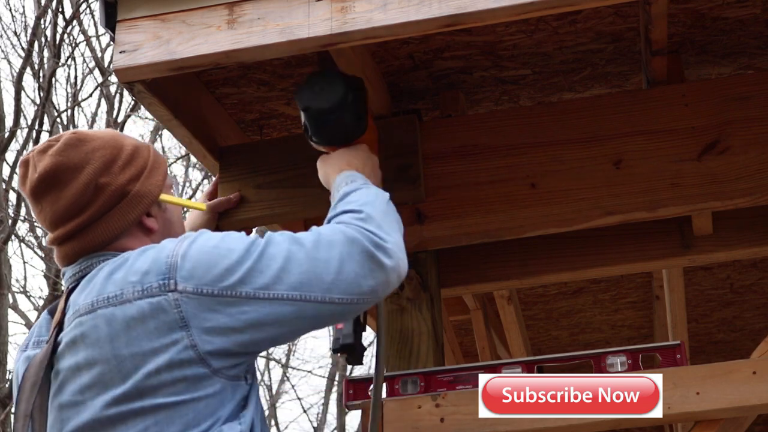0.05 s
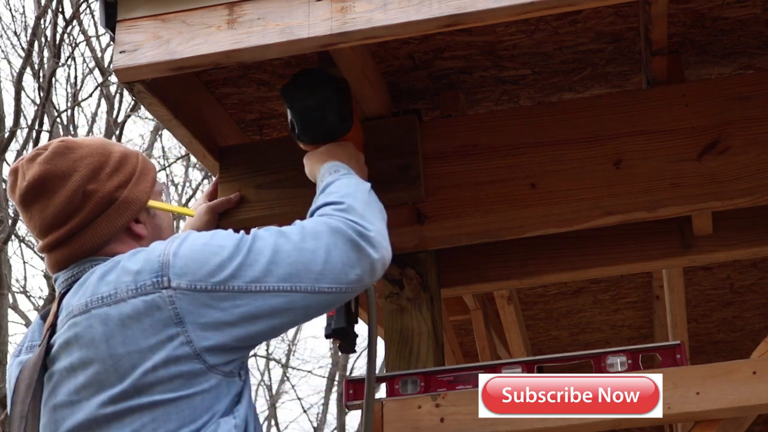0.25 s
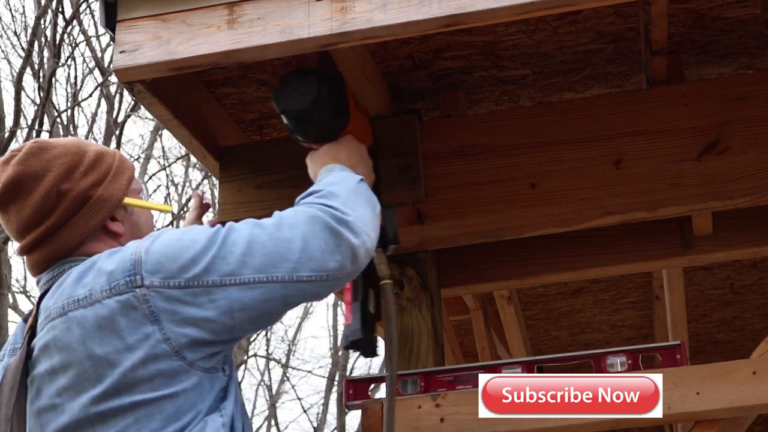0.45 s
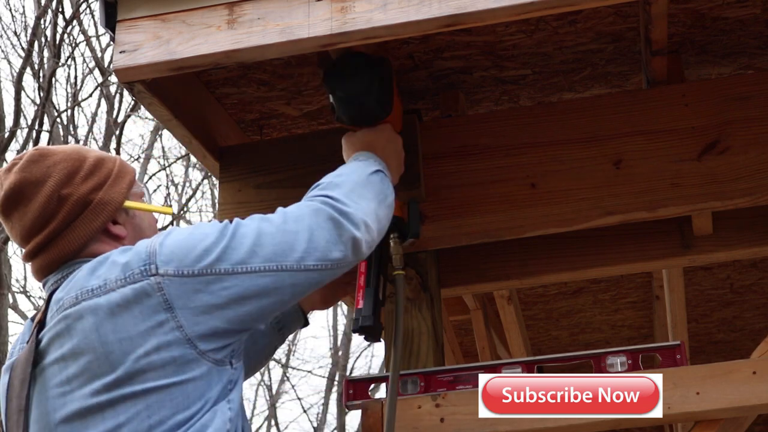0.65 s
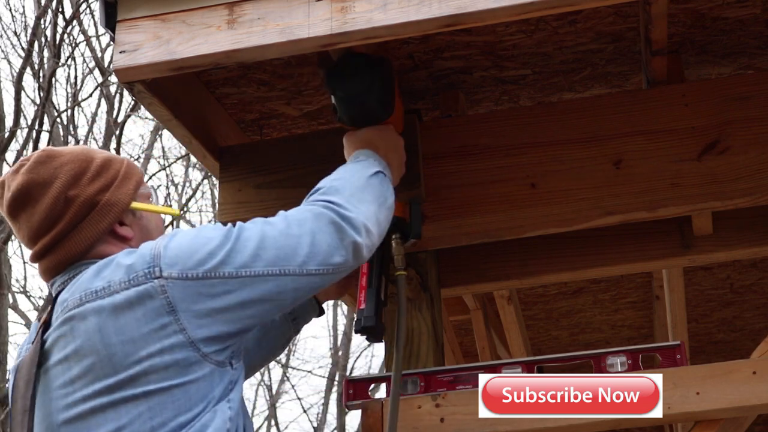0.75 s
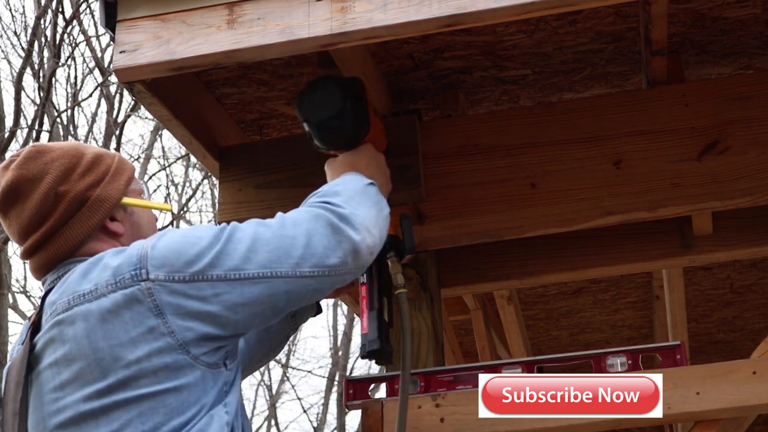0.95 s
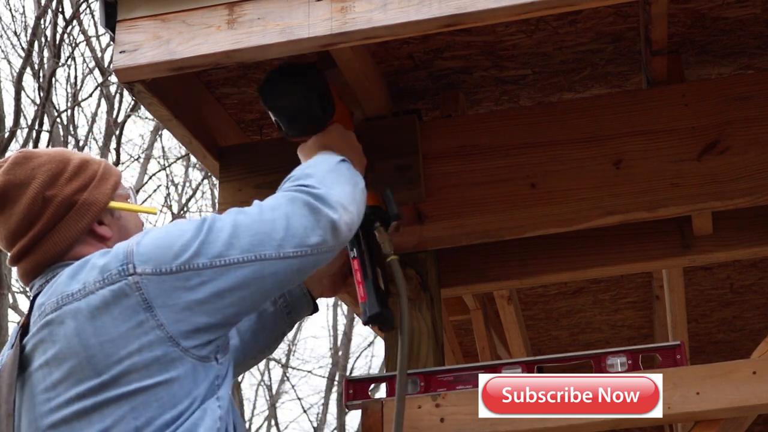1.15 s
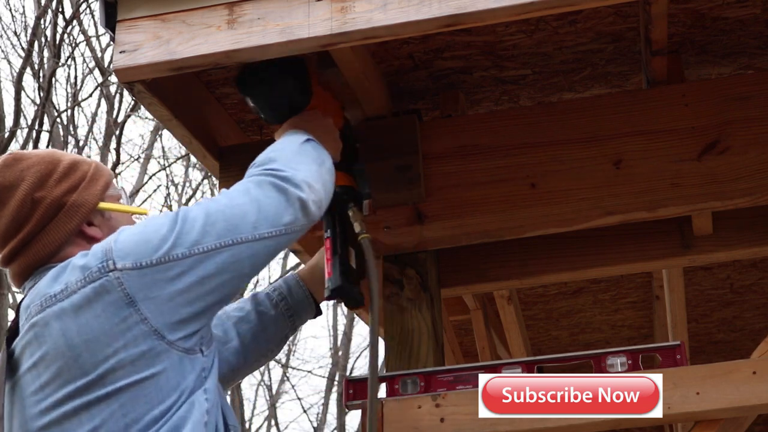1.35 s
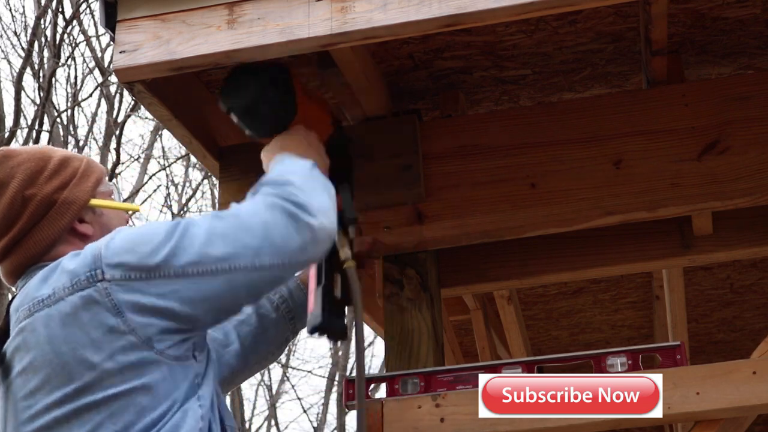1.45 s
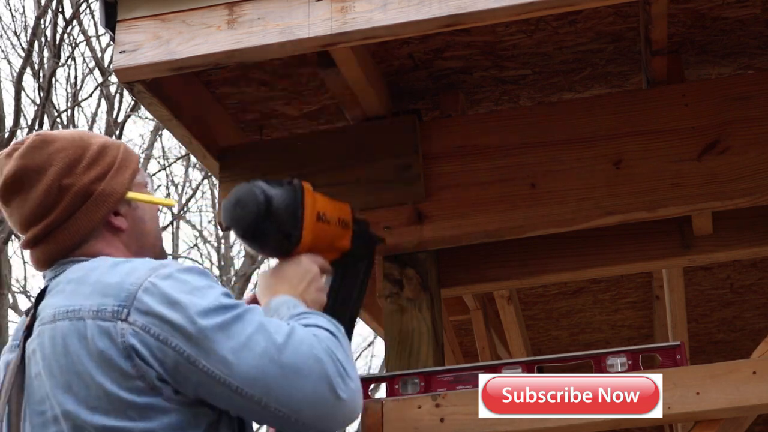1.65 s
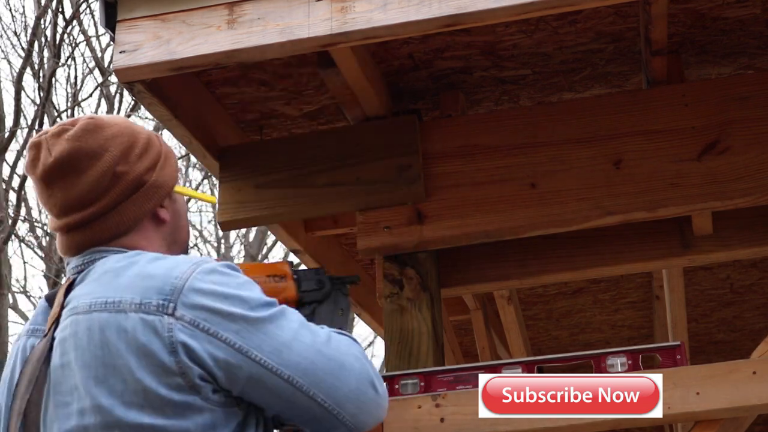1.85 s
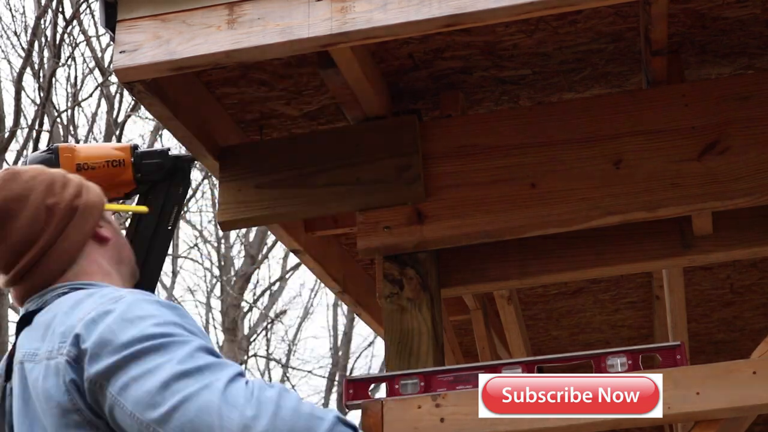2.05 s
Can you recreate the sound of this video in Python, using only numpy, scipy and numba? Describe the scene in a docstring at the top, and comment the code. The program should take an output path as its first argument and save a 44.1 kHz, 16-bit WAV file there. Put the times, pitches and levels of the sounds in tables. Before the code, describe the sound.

A pneumatic nailer fires three nails overhead, at about 0.37, 0.86 and 1.43 seconds: a hard crack, woody slam and brief air puff each. Metal clicks and timber knocks come before each shot, around 0.25, 0.7 and 1.1-1.3. The tool clacks at 1.82, then faint rattles follow. Near roof reflections and diffuse tree echo swell after each limited, clipped shot, over quiet outdoor hiss and low rumble.

```python
"""Under the open roof of a timber frame, trees around: a pneumatic nailer drives three nails overhead.
Each shot is a piston blow, the slam of the nail going home and a puff of exhaust, made of noise and damped sines.
Between shots steel parts click in noise bursts with a ring, and the tool knocks and scrapes on timber modes.
Roof reflections stand near, scattered echo from the trees far, over air hiss and low rumble.
The recorder's limiter ducks at each shot, so the echo swells as the gain comes back."""
import sys
import numpy as np
from scipy import signal
from scipy.fft import rfft, irfft
from scipy.io import wavfile
from numba import njit

SR = 44100
rng = np.random.default_rng(int(sys.argv[2]) if len(sys.argv) > 2 else 0)


def unload_audio(sound):
    """Save the sound as a 16-bit wav file, at the path given as the first command line argument."""
    columns = np.transpose(np.atleast_2d(sound))
    # keep every value between -1 and 1, then stretch to whole-number steps
    steps = np.round(np.clip(columns, -1, 1) * 32767)
    wavfile.write(sys.argv[1], SR, steps.astype(np.int16))


N = 92610
T = np.arange(N) / SR  # time axis [s]

# Open air, spectrum of the hiss: (frequency [Hz], level [dB])
AIR_COLOUR = [(25, 1), (60, -9.5), (130, 2.5), (220, 4.5), (400, -9.5), (700, -11), (1000, -13.5),
              (1600, -12.5), (2800, -17.5), (5000, -24), (10000, -29), (16000, -34)]
# Level of the hiss: (time [s], level [dB])
AIR_LEVEL = [(0, -43), (.2, -47.5), (1.7, -42.5), (2.1, -45)]
# Spectrum of the low outdoor rumble: (frequency [Hz], level [dB])
RUMBLE_COLOUR = [(25, -1.5), (60, 2.5), (110, 3.5), (250, -8.5), (600, -56), (4000, -65)]
# Level of the rumble: (time [s], level [dB])
RUMBLE_LEVEL = [(0, -52), (.6, -46), (1.2, -43.5), (1.7, -48), (2.1, -39.5)]

# Far echo from the trees: (frequency [Hz], level [dB])
ECHO_COLOUR = [(100, 2.5), (250, 3.5), (450, 0), (700, 1.5), (1100, 1), (2000, 1), (3000, 2), (6500, 0),
               (10000, -5.5), (16000, -8.5)]
ECHO_DB, ECHO_BUILD_S = -18.5, 0.022
ECHO_T60_LOW_S, ECHO_T60_HIGH_S = 0.6, 0.35
# Near reflections from the roof: (frequency [Hz], level [dB])
ROOF_COLOUR = [(150, 1), (1000, 4.5), (5000, 1.5), (16000, -3)]
ROOF_DB, ROOF_T60_S, ROOF_DELAY_S = -16.5, 0.084, 0.0048

# Tool against timber: (time [s], level [dB], centre of the excited band [Hz],
# distance from the centre at which modes are 6 dB down [octaves], scrape [dB], scrape t60 [s])
KNOCKS = [(.238, -18, 820, 0.79, -11, 0.09), (0.2799, -32, 805, 0.42, -2, 0.089),
          (.357, -31.5, 750, 0.41, -10, 0.041), (0.6928, -19.5, 643, 1.2, -2.5, 0.023),
          (0.7019, -10, 340, 1.5, -14, 0.086), (.722, -31.5, 400, .8, 4, 0.28),
          (0.811, -21.5, 990, 0.46, -1.5, 0.041), (.823, -26.5, 350, 2.1, -2.5, 0.098),
          (1.237, -29.5, 980, 0.95, -5, 0.38), (1.272, -37, 260, 0.54, 2, 0.18),
          (1.308, -25.5, 264, 0.41, -1, 0.16), (1.391, -29, 696, 1.7, -7.5, 0.063),
          (1.91, -23, 935, 0.44, -6, 0.096)]
# Timber modes: (frequency [Hz], level [dB], t60 [s])
TIMBER = [(201, -5, 0.067), (312, -2, 0.057), (370, -9.5, 0.081), (613, -10, 0.046), (704, -8.5, 0.096),
          (913, -12.5, 0.077), (1086, -12, 0.051), (1330, -18, .045), (1700, -7, 0.041), (2100, -13, 0.025)]
# Treble end of the scrape: (frequency [Hz], level [dB])
SCRAPE_TOP = [(4000, -23), (8000, -65)]

# Housing clacks as the tool is lowered: (time [s], level [dB])
CLACKS = [(1.8203, -25), (1.8227, -17.5)]
# Housing modes: (frequency [Hz], level [dB], t60 [s])
HOUSING = [(842, -15.5, .05), (1003, -9, 0.11), (1340, -12.5, 0.17), (1710, -7.5, 0.052), (2300, -8, .055),
           (2820, -4, 0.068), (3330, -11, 0.042), (4900, -24, 0.022)]
# Noise of a clack: (frequency [Hz], level [dB])
CLACK_COLOUR = [(240, -49), (400, -30), (920, -4.5), (1500, -19), (2380, 6), (3310, -11), (3670, -13),
                (6560, -19), (14000, -52)]
CLACK_RING_DB, CLACK_NOISE_DB, CLACK_T60_S = -4.5, 1, 0.033

# Metal clicks of the nose and the nail strip: (time [s], level [dB], t60 of the noise [s])
CLICKS = [(0.2059, -35.5, 0.0074), (.2372, -15, 0.032), (0.2427, -23, 0.02), (.249, -19.5, 0.017),
          (0.2697, -13, 0.015), (0.279, -32, .025), (0.3164, -35, 0.0092), (0.335, -43, .015),
          (0.358, -37.5, .015), (0.6885, -30, 0.017), (0.6921, -14, 0.022), (0.705, -21.5, 0.023),
          (0.7096, -21.5, 0.03), (.807, -20, .025), (.812, -21.5, 0.02), (.9455, -18, 0.015),
          (1.0821, -13, 0.015), (1.0842, -16.5, .011), (1.1015, -22.5, 0.0089), (1.114, -27, .012),
          (1.234, -15, 0.045), (1.238, -15, 0.0093), (1.2461, -19, 0.06), (1.2488, -16, .025),
          (1.256, -40, .02), (1.264, -28, 0.022), (1.2857, -14, 0.0054), (1.2895, -24.5, 0.028),
          (1.304, -31, 0.06), (1.3934, -41.5, 0.061), (1.88, -44, 0.099), (1.912, -44, 0.051),
          (1.9233, -42, .05), (1.9397, -40, .04), (1.9475, -32, 0.033), (1.962, -40, .025),
          (1.97, -38.5, 0.042), (1.9887, -42.5, 0.058)]
# Noise of a click: (frequency [Hz], level [dB])
CLICK_COLOUR = [(400, -20), (1000, -22), (2000, -10.5), (3200, -4), (4500, -1.5), (5400, 0.5), (6100, -3),
                (6900, 2), (8200, -8), (10400, -0.5), (12900, -15), (16000, -21)]
# Ring of the steel parts: (frequency [Hz], level [dB], t60 [s])
STEEL = [(3574, -19.5, 0.065), (4520, -15, .04), (5400, -12, 0.041), (6250, -13.5, 0.015),
         (7050, -17.5, 0.03), (10330, -13, 0.033)]

# Shots: (time [s], blow [dB], slam [dB], exhaust [dB], pitch ratio of the piston)
SHOTS = [(0.3732, -5, -4, -1, 0.966), (0.8616, -6, -6, -2, 1.044), (1.4253, -5, -7, -5, 1.013)]
# Piston blow: (frequency before the pitch ratio [Hz], level [dB], t60 [s])
PISTON = [(526, 6, 0.0034), (1620, 10.5, 0.0034), (2053, 20.5, 0.007), (3400, -7, 0.0019)]
CRACK_DB, CRACK_T60_S = 10.5, 0.018
# Impacts of driver and nail within a shot: (delay [s], noise [dB], ring [dB])
SLAM = [(.0062, 17.5, 4.5), (.0087, 19, -4.5), (.0108, 13, -21.5)]
# Noise of blow and slam: (frequency [Hz], level [dB])
SLAM_COLOUR = [(88, -35), (150, -33), (341, -13.5), (821, -0.5), (1690, -14.5), (2400, 0.5), (5050, -5),
               (6260, -6), (7920, -6), (8730, -11.5), (10600, -3), (12700, -16), (16000, -15)]
SLAM_T60_S = 0.014
# Ring of the nailed board and the tool: (frequency [Hz], level [dB], t60 [s])
BOARD = [(362, -7, 0.03), (536, -9, 0.08), (676, -4, 0.07), (900, 0, 0.039), (1165, -33, 0.11),
         (1364, -2, .035), (1675, 0.5, 0.026), (1903, 3, 0.022), (2150, -13, 0.05), (2283, -3, 0.031),
         (3360, -17, .045)]
# Exhaust noise: (frequency [Hz], level [dB])
EXHAUST_COLOUR = [(180, -46), (300, -18.5), (678, -9.5), (1150, 7), (1900, -7.5), (2140, -11), (3080, 6),
                  (4370, 4), (10700, 11), (15000, 3), (16000, -24.5)]
EXHAUST_DB, EXHAUST_DELAY_S, EXHAUST_HOLD_S, EXHAUST_T60_S = -4, 0.011, 0.017, 0.088
RECOIL_DELAY_S, RECOIL_DB = 0.036, -6  # the nose falls back on the board

RADIATION_HZ = 202  # small parts radiate little below this

# The recorder
LIMIT_DB, LIMIT_ATTACK_S, LIMIT_HOLD_S, RELEASE_DB_PER_S = -3, 0.0004, 0.023, 204
BASS_CUT_HZ, BASS_CUT_DB = 271, -7
TOP_HZ = 15900


def amp(db):
    """Decibels to gain."""
    return 10 ** (np.asarray(db) / 20)


def fade(t60):
    """Exponential decay by 60 dB in t60 seconds."""
    return np.exp(-np.log(1000) * T / max(t60, 1e-4))


def level_over_time(points):
    """Gain through the scene from (time [s], level [dB]) points."""
    times, db = np.array(points).T
    return amp(np.interp(T, times, db))


def add(out, start, x):
    """Mix x into out from a start time in seconds."""
    i = int(round(start * SR))
    out[i:] += x[:N - i]


def noise(colour):
    """Noise of rms 1 with a spectrum of (frequency [Hz], level [dB]) points."""
    hz, db = np.array(colour, float).T
    f = np.maximum(np.arange(N // 2 + 1) * SR / N, 1)
    gain = amp(np.interp(np.log(f), np.log(hz), db))
    gain = gain * np.minimum(f / hz[0], 1) ** 2  # 12 dB per octave down below the first point
    x = irfft(rfft(rng.standard_normal(N)) * gain, N)
    return x / x.std()


def ring(modes, ratio=1):
    """Damped sines of a struck object, all pitched by the ratio."""
    return sum(amp(db) * fade(t60) * np.sin(2 * np.pi * hz * ratio * T) for hz, db, t60 in modes)


def outdoors():
    """Faint open-air hiss over a low rumble, two noises with slowly moving levels."""
    hiss = level_over_time(AIR_LEVEL) * noise(AIR_COLOUR)
    rumble = level_over_time(RUMBLE_LEVEL) * noise(RUMBLE_COLOUR)
    return hiss + rumble


def tree_echo(x):
    """Diffuse scatter from the trees: each band's energy builds and dies, treble first."""
    echo = np.zeros(N)
    edges = np.geomspace(100, 17000, 15)
    hz, db = np.array(ECHO_COLOUR).T
    for lo, hi in zip(edges, edges[1:]):
        band = signal.butter(3, [lo, hi], "band", fs=SR, output="sos")
        centre = np.sqrt(lo * hi)
        t60 = ECHO_T60_LOW_S + (ECHO_T60_HIGH_S - ECHO_T60_LOW_S) * centre / edges[-1]
        decay = (fade(t60) * (1 - np.exp(-T / ECHO_BUILD_S))) ** 2
        energy = signal.sosfilt(band, x) ** 2
        power = np.abs(signal.fftconvolve(energy, decay / decay.sum())[:N])
        scatter = signal.sosfilt(band, rng.standard_normal(N))
        gain = amp(ECHO_DB + np.interp(np.log(centre), np.log(hz), db))
        echo += gain * np.sqrt(power) * scatter / scatter.std()
    return echo


def space(x):
    """Direct sound with quick, dense reflections under the roof, then the echo from the trees."""
    near = noise(ROOF_COLOUR) * fade(ROOF_T60_S) * (T > ROOF_DELAY_S)
    near = near / np.linalg.norm(near)
    under_roof = x + amp(ROOF_DB) * signal.fftconvolve(x, near)[:N]
    return under_roof + tree_echo(x)


def knocks():
    """The tool is set against the timber and scrapes on; each contact excites its own range of modes."""
    out = np.zeros(N)
    for start, db, centre, octaves, scrape_db, scrape_t60 in KNOCKS:
        modes = []
        for hz, mode_db, t60 in TIMBER:
            loss_db = 6 * (np.log2(hz / centre) / octaves) ** 2
            modes.append((hz, mode_db - loss_db, t60))
        scrape = noise([m[:2] for m in modes] + SCRAPE_TOP) * fade(scrape_t60)
        add(out, start, amp(db) * (ring(modes) + amp(scrape_db) * scrape))
    return out


def clack():
    """The housing rings briefly, with a noise burst, as the tool comes down."""
    out = np.zeros(N)
    housing = amp(CLACK_RING_DB) * ring(HOUSING)
    for start, db in CLACKS:
        crack = amp(CLACK_NOISE_DB) * noise(CLACK_COLOUR) * fade(CLACK_T60_S)
        add(out, start, amp(db) * (housing + crack))
    return out


def rattle():
    """Loose steel parts click: a short crash with a faint ring."""
    out, steel, crash = np.zeros(N), ring(STEEL), noise(CLICK_COLOUR)
    for start, db, t60 in CLICKS:
        burst = np.roll(crash, rng.integers(N)) * fade(t60)  # another stretch of the noise each time
        add(out, start, amp(db) * (burst + steel))
    return out


def nailer():
    """Piston blow, slam of the nail into the ringing board, exhaust puff and recoil tap."""
    out, board = np.zeros(N), ring(BOARD)
    # the puff holds steady, then dies away
    puff = np.exp(-np.log(1000) * np.maximum(T - EXHAUST_HOLD_S, 0) / EXHAUST_T60_S)
    for start, blow_db, slam_db, exhaust_db, ratio in SHOTS:
        crack = amp(CRACK_DB) * noise(SLAM_COLOUR) * fade(CRACK_T60_S)
        add(out, start, amp(blow_db) * (crack - ring(PISTON, ratio) - board))
        for delay, noise_db, ring_db in SLAM:
            burst = amp(noise_db) * noise(SLAM_COLOUR) * fade(SLAM_T60_S)
            add(out, start + delay, amp(slam_db) * (burst - amp(ring_db) * board))
        exhaust = puff * noise(EXHAUST_COLOUR)
        add(out, start + EXHAUST_DELAY_S, amp(exhaust_db + EXHAUST_DB) * exhaust)
        add(out, start + RECOIL_DELAY_S, amp(slam_db + RECOIL_DB) * board)
    return out


def scene():
    """Nailer and handling noises in their surroundings, as they reach the microphone."""
    sources = knocks() + clack() + rattle() + nailer()
    radiation = signal.butter(2, RADIATION_HZ, "high", fs=SR, output="sos")
    radiated = signal.sosfilt(radiation, sources)
    return (outdoors() + space(radiated))[None]


@njit
def gain_cut(over, attack, hold, release):
    """Gain reduction in dB: rises fast with the overload, holds, then falls at a steady rate."""
    out, cut, wait = np.zeros(len(over)), 0., 0.
    for i in range(len(over)):
        if over[i] > cut:
            cut += (over[i] - cut) * attack
            wait = hold
        elif wait > 0:
            wait -= 1
        else:
            cut = max(cut - release, 0.)
        out[i] = cut
    return out


def record(dry):
    """The limiter ducks after each shot; peaks clip; the bass is thinned; peaks clip again; the top is cut."""
    x = dry[0]
    over = 20 * np.log10(np.abs(x) + 1e-9) - LIMIT_DB
    attack = 1 - np.exp(-1 / (LIMIT_ATTACK_S * SR))
    cut_db = gain_cut(over, attack, float(LIMIT_HOLD_S * SR), RELEASE_DB_PER_S / SR)
    x = np.clip(x * amp(-cut_db), -1.2, 1.2)
    bass = signal.sosfiltfilt(signal.butter(3, BASS_CUT_HZ, fs=SR, output="sos"), x)
    x = x - (1 - amp(BASS_CUT_DB)) * bass
    x = np.clip(x, -0.95, 0.95)
    top_cut = signal.ellip(10, 0.2, 80, TOP_HZ, fs=SR, output="sos")
    return signal.sosfilt(top_cut, x)[None]


dry = scene()
out = record(dry)
unload_audio(out)
```